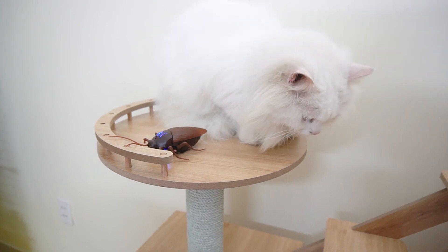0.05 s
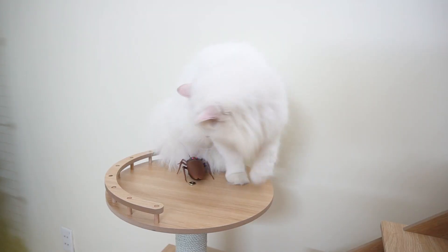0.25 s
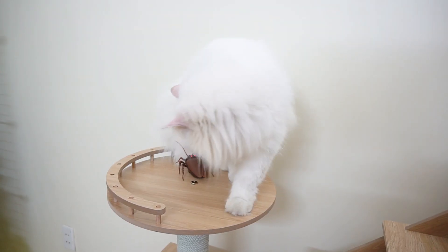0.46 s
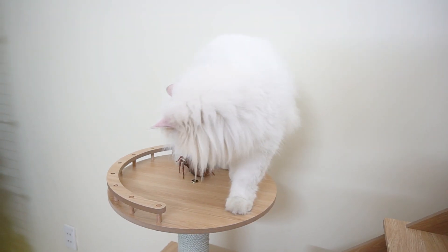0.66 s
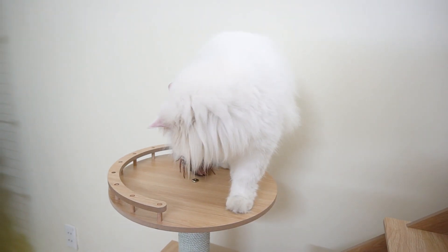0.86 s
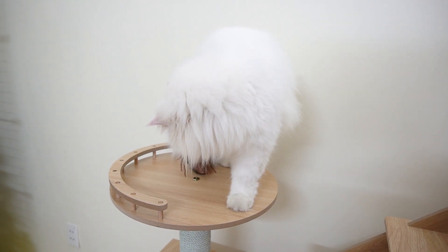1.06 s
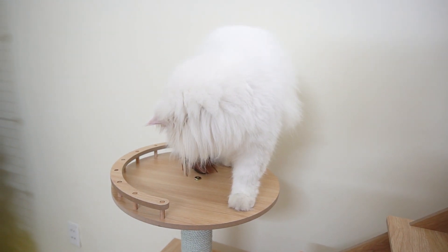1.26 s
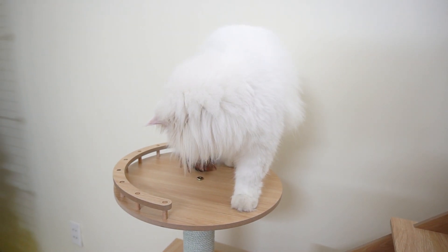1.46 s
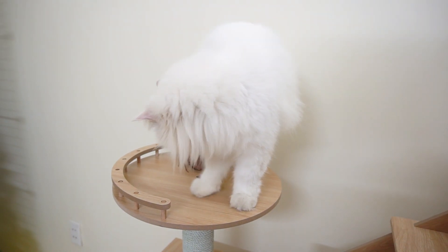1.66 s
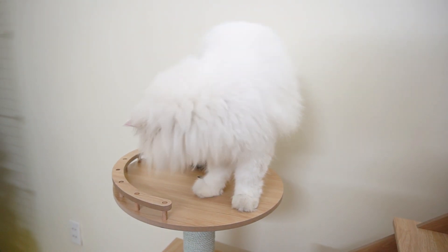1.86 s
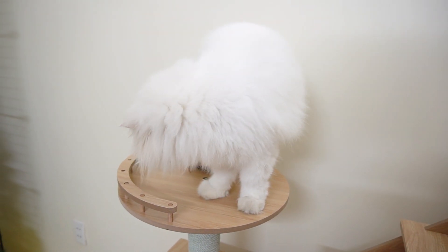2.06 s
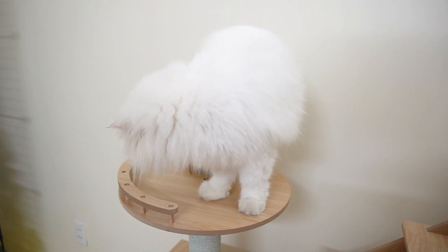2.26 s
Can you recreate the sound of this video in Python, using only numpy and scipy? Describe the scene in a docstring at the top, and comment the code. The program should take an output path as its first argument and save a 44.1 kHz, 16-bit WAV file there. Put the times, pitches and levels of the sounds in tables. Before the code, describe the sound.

A toy beetle's gears whirr and snap twice on a wooden platform, ending with a thump.

```python
"""A small bare room, a stereo microphone near a round wooden platform, which sits slightly to the left.
On it a cat pins a motorised toy beetle. After a faint shuffle the toy runs in two short bursts: its gears
whirr, its legs patter on the board and the blocked drive ratchets in sharp snaps. A plastic click comes
before the second burst, then the board is thumped and the toy rocks to rest. The room rings after it."""
import sys
import numpy as np
from scipy import signal
from scipy.fft import rfft, irfft, next_fast_len
from scipy.io import wavfile
from scipy.ndimage import uniform_filter1d

SR = 44100
rng = np.random.default_rng(int(sys.argv[2]) if len(sys.argv) > 2 else 0)


def store_wav(level_fs):
    """Save 16-bit WAV to argv[1]."""
    pcm = np.round(np.clip(np.atleast_2d(level_fs), -1, 1) * 32767)
    wavfile.write(sys.argv[1], SR, pcm.T.astype(np.int16))


N = 101429

# Spectrum of the shuffle. Each row: frequency in Hz, level in dB.
SHUFFLE_SPECTRUM = [(60, -4), (140, 1), (330, 4.5), (700, -6), (1400, -9), (2000, -18), (2700, -11.5),
                    (4000, -25.5), (15000, -30)]
# Runs of the motor. Each row: start, stop, spin-up and run-down time constants, all in seconds.
MOTOR_RUNS = [(0.207, 0.461, 0.0014, 0.05), (1.371, 1.78, 0.048, 0.062)]
# Resonances of the gearbox. Each row: frequency in Hz, width in Hz, gain in dB.
GEARBOX_MODES = [(1634, 280, -3.5), (1863, 110, 5), (2070, 178, 1.5), (3030, 470, -3), (3600, 340, -3.5),
                 (4707, 420, 3.5), (5420, 950, -1), (5940, 540, 0), (7600, 250, -2), (13300, 2000, -11)]
# Resonances of the wooden platform. Each row: frequency in Hz, width in Hz, gain in dB.
BOARD_MODES = [(234.3, 12.6, 6), (292.7, 22.4, 7.5), (338, 25.2, 5.5), (451, 40, 5.5), (603, 81, 0),
               (664.6, 24.2, 9), (785.4, 40, 5.5), (845, 19.7, 7.5), (923, 43, 2), (1032, 81, -5.5),
               (1310, 68, -4.5), (2310, 130, -19)]
# Slips of the ratchet. Each row: start in seconds, relative level in dB.
RATCHET_SLIPS = [(0.2096, -16), (0.2251, -17), (0.2412, -20), (0.2567, -23.3), (0.2756, -20),
                 (0.295, -18.5), (0.315, -19), (0.338, -17), (0.356, -20.5), (0.374, -18), (0.391, -19),
                 (0.4094, -21), (0.426, -19), (0.4445, -20.5), (0.4703, -17), (1.3978, -22), (1.424, -20.5),
                 (1.4479, -24.5), (1.468, -23.5), (1.4865, -22.5), (1.502, -22.5), (1.5174, -20.5),
                 (1.5345, -19.5), (1.5589, -24.5), (1.594, -20.5), (1.6213, -19.5), (1.6489, -16.5),
                 (1.67, -20), (1.6901, -18), (1.7071, -21.5), (1.7256, -23), (1.7474, -24), (1.7688, -21),
                 (1.793, -26.5)]
# Resonances of the plastic shell. Each row: frequency in Hz, width in Hz, gain in dB.
SHELL_MODES = [(2000, 590, -10), (4690, 600, 1.5), (5250, 320, 7), (6310, 400, 5), (7230, 410, 1),
               (7900, 410, -2), (9660, 790, -1.5), (11060, 510, -2), (13760, 1170, -3)]
# Knocks on the platform. Each row: start in seconds, level in dB, centre of the contact's spectrum
# in Hz, plastic tick against the wood in dB.
BOARD_KNOCKS = [(.224, -28, 317, -27), (.348, -32.5, 277, -27), (.468, -30.5, 343, -25),
                (1.402, -39, 387, -23), (1.703, -30.5, 690, -23), (1.87, -18.5, 540, -6),
                (1.9162, -11, 875, -9), (1.973, -23, 860, -2.5), (1.993, -25, 686, -41),
                (2.011, -26, 634, -30), (2.068, -35.5, 634, -22)]
# Spectrum of a plastic tick. Each row: frequency in Hz, level in dB.
TICK_SPECTRUM = [(200, -32), (1200, -3.5), (2400, -2.5), (3500, -4.5), (5000, -2.5), (8000, -10.5),
                 (15000, -12.5)]
# The toy tapping the rail. Each row: start in seconds, level in dB, tick against the wood in dB.
RAIL_TAPS = [(.444, -32.5, -9), (.465, -23.5, -6), (.49, -30.5, -11), (.512, -30.5, -9), (.559, -33, -5),
             (0.7961, -36.5, -8), (.874, -49, -21), (1.774, -30.5, -18)]
# Resonances of the wooden rail. Each row: frequency in Hz, width in Hz, gain in dB.
RAIL_MODES = [(660, 70, 1), (776, 31, 0), (855, 43, 3), (1310, 44, -6.5), (1639, 79, 0.5)]
# Resonances of the plastic click. Each row: frequency in Hz, width in Hz, gain in dB.
CLICK_MODES = [(2300, 730, -0.5), (7920, 280, 0), (12100, 1900, -13)]
# Spectrum of the click's crack. Each row: frequency in Hz, level in dB.
CRACK_SPECTRUM = [(300, -13.5), (1200, -23), (2650, 10.5), (4200, -3.5), (7500, 2.5), (11000, -8),
                  (13000, -16), (16000, -18)]
# Decay of the room. Each row: band centre in Hz, seconds to fall by 60 dB.
ROOM_DECAY = [(200, 0.93), (530, 0.52), (1400, 0.76), (3700, 0.5455), (9700, 0.43), (15000, 0.31)]
# Colour of the reverberation. Each row: frequency in Hz, gain in dB.
ROOM_SPECTRUM = [(100, -21.5), (300, 3), (800, -4.5), (2000, -2), (5000, -3), (9000, 0.5), (15000, -2.5)]
# Stereo width of the room. Each row: frequency in Hz, side against mid in dB.
ROOM_WIDTH = [(40, -37), (130, -7), (300, -14), (700, -7), (1400, -4.5), (3000, -3.5), (6000, 0),
              (10000, 0), (15000, 0.5)]
# Direct sound at the microphone. Each row: frequency in Hz, left against right in dB.
MIC_BALANCE = [(500, 0.5), (2500, -1), (5500, 5), (9000, 2.5), (14000, -2)]
# Spectrum of the room's quiet air. Each row: frequency in Hz, level in dB.
AIR_SPECTRUM = [(15, -65), (25, -4), (127, -2.5), (285, -10.5), (427, -7), (545, -8.5), (1740, -17.5),
                (2110, -20), (2410, -18), (8140, -25), (16000, -28)]


def amp(db):
    """Decibels to gain."""
    return 10 ** (np.asarray(db) / 20)


def unit(x):
    """Scale to rms 1."""
    return x / np.sqrt(np.mean(x ** 2) + 1e-30)


def blow(x, burst_s=0.002):
    """Scale a short sound to the energy of a full-level burst lasting burst_s."""
    return x * np.sqrt(burst_s * SR / (np.sum(x ** 2) + 1e-30))


def along(table, hz):
    """Read a table on a log-frequency axis."""
    freqs, values = np.array(table, float).T
    return np.interp(np.log(np.maximum(hz, 1)), np.log(freqs), values)


def colour(x, table):
    """Minimum-phase filter with a (Hz, dB) response."""
    size = 2 * next_fast_len(x.shape[-1])
    gain = amp(along(table, np.fft.rfftfreq(size, 1 / SR)))
    cepstrum = irfft(np.log(gain))
    cepstrum[1:size // 2] *= 2
    cepstrum[size // 2 + 1:] = 0
    return irfft(rfft(x, size) * np.exp(rfft(cepstrum)), size)[..., :x.shape[-1]]


def cut(x, hz, kind, order=2):
    """Low-pass or high-pass."""
    return signal.sosfilt(signal.butter(order, hz, kind, fs=SR, output="sos"), x)


def ring(x, modes, detune=1):
    """Drive a set of resonances of alternating polarity."""
    out = 0
    for k, (hz, width, db) in enumerate(modes):
        resonator = signal.iirpeak(hz * detune, hz / width, fs=SR)
        out = out + (-1) ** k * amp(db) * signal.lfilter(*resonator, x + 1e-18)
    return out


def add(track, start_s, x):
    """Mix a sound into a track at a time."""
    i = max(int(start_s * SR), 0)
    track[i:i + len(x)] += x[:max(N - i, 0)]


def chatter(rise_s, size=2048):
    """A cluster of tiny contacts that peaks at twice rise_s and quickly dies."""
    age = np.arange(size) / SR / rise_s
    return np.sign(rng.standard_normal(size)) * age ** 2 * np.exp(-age)


def impacts(hz, jitter, scatter_db, count=4000):
    """A train of unevenly spaced impulses of uneven strength, at a rate that may change."""
    gap, strength = rng.standard_normal((count, 2)).T
    cycles = np.cumsum(hz * np.ones(N)) / SR
    at = np.searchsorted(cycles, np.cumsum(np.exp(jitter * gap)))
    return unit(np.bincount(at[at < N], amp(scatter_db * strength)[at < N], N))


def shuffle(start_s=0.085, stop_s=0.24, db=-51.5):
    """A faint, dull shuffle on the board before the first run."""
    t = np.arange(N) / SR
    gate = uniform_filter1d(1. * ((t > start_s) & (t < stop_s)), size=400)
    return amp(db) * unit(colour(rng.standard_normal(N), SHUFFLE_SPECTRUM)) * gate


def motor_effort(start_share=0.36):
    """Motor effort (0-1): it jumps to start_share, spins up, holds and runs down."""
    t = np.arange(N) / SR
    effort = 0
    for start, stop, up, down in MOTOR_RUNS:
        spin = (t > start) * (1 - (1 - start_share) * np.exp(-np.maximum(t - start, 0) / up))
        effort = effort + spin * np.exp(-np.maximum(t - stop, 0) / down)
    return effort


def gears(effort, tooth_hz=953.3, hiss_db=-3.5, db=-28.5):
    """Meshing teeth ring the gearbox; at low speed they thin out and the rubbing hiss falls away."""
    teeth = impacts(tooth_hz * effort, jitter=0.25, scatter_db=4.5)
    teeth = cut(teeth, 1200, "high", order=4)
    hiss = cut(rng.standard_normal(N), 1390, "high") * effort ** 2
    whirr = unit(ring(teeth * effort, GEARBOX_MODES)) + amp(hiss_db) * unit(hiss)
    return amp(db) * unit(whirr) * np.sqrt(np.mean(effort ** 2))


def legs(effort, patter_hz=149.4, soft_hz=620, db=-47):
    """The legs patter softly on the board, louder as the motor comes up to speed."""
    steps = impacts(patter_hz, jitter=0.45, scatter_db=1)
    steps = cut(steps, soft_hz, "low", order=1)
    steps = cut(steps, 440, "high", order=4)
    return amp(db) * ring(steps * effort ** 2, BOARD_MODES) / np.std(ring(steps, BOARD_MODES))


def ratchet(rise_s=0.00017, rebound_s=0.0013, rebound_db=-3.5, sizzle_db=-4, gain_db=5.5):
    """At each slip the pawl strikes and bounces once, ringing the shell a little differently."""
    out = np.zeros(N)
    for start, db in RATCHET_SLIPS:
        lag, detune = 2 * rng.random(2) - 1
        rebound = amp(rebound_db) * np.roll(chatter(rise_s), int(rebound_s * (1 + lag / 2) * SR))
        shell = ring(chatter(rise_s) + rebound, SHELL_MODES, 1 + 0.013 * detune)
        sizzle = cut(chatter(rise_s) + rebound, 3750, "high")
        snap = blow(blow(shell) + amp(sizzle_db) * blow(sizzle))
        add(out, start, amp(db + gain_db) * snap)
    return out


def strike(modes, centre_hz, tick_db, grit=0.02, contact_s=0.0037, contact_q=1.69, tick_s=0.004):
    """One blow: a brief, gritty push rings the wood, and the toy's plastic adds a tick."""
    t = np.arange(SR // 2) / SR
    push = (t == 0) + grit * rng.standard_normal(len(t)) * np.exp(-t / contact_s)
    contact = ring(push, [(centre_hz, centre_hz / contact_q, 0)])
    wood = ring(contact, modes)
    tick = colour(rng.standard_normal(len(t)) * np.exp(-t / tick_s), TICK_SPECTRUM)
    return blow(wood) + amp(tick_db) * blow(tick)


def knocks(thud_hz=86, thud_db=-28):
    """Blows on the board, each with a low thud as the stand gives, and lighter taps on its rail."""
    out, t = np.zeros(N), np.arange(SR // 4) / SR
    thud = amp(thud_db) * blow(np.sin(2 * np.pi * thud_hz * t) * np.exp(-t * thud_hz))
    for start, db, centre_hz, tick_db in BOARD_KNOCKS:
        add(out, start, amp(db) * strike(BOARD_MODES, centre_hz, tick_db))
        add(out, start, amp(db) * thud)
    for start, db, tick_db in RAIL_TAPS:
        add(out, start, amp(db) * strike(RAIL_MODES, centre_hz=1090, tick_db=tick_db))
    return out


def click(start_s=1.2818, rise_s=0.00037, body_db=-21, crack_db=-33):
    """One hard click of plastic: a brief ring, and a broad crack at its peak."""
    body, crack = np.zeros(N), np.zeros(N)
    add(body, start_s, amp(body_db) * blow(ring(chatter(rise_s), CLICK_MODES)))
    pulse = colour(signal.unit_impulse(SR // 20), CRACK_SPECTRUM)
    add(crack, start_s + 2 * rise_s, amp(crack_db) * blow(pulse))
    return body, crack


def stereo_noise():
    """Noise that is alike left and right in the bass and wide in the treble."""
    mid, side = rng.standard_normal((2, N))
    return mid + colour(side, ROOM_WIDTH) * np.array([[1], [-1]])


def room(predelay_s=0.00094, build_s=0.00096):
    """The room's response at the microphone: dense reflections whose treble dies first."""
    t = np.maximum(np.arange(N) / SR - predelay_s, 0)
    spectrum, hz = rfft(stereo_noise()), np.fft.rfftfreq(N, 1 / SR)
    tail = 0
    for centre, t60 in ROOM_DECAY:
        band_weight = along([(f, f == centre) for f, _ in ROOM_DECAY], hz)
        band = irfft(spectrum * band_weight, N)
        fade = (1 - np.exp(-t / build_s)) * np.exp(-np.log(1000) * t / t60)
        tail = tail + band * fade / np.linalg.norm(fade)
    return colour(tail[:, :SR], ROOM_SPECTRUM)


def scene(air_db=-54.5):
    """Toy and board slightly left of the microphone, with the room and its quiet air all around."""
    effort = motor_effort()
    click_body, click_crack = click()
    # Each pair: a sound, its send to the room in dB.
    sources = [(ratchet(), -5.5), (gears(effort), -1.5), (legs(effort) + knocks() + shuffle(), 1.5),
               (click_body, -7), (click_crack, 12)]
    mono = sum(x for x, _ in sources)
    send = sum(x * amp(send_db) for x, send_db in sources)
    left = colour(mono, [(hz, db / 2) for hz, db in MIC_BALANCE])
    right = colour(mono, [(hz, -db / 2) for hz, db in MIC_BALANCE])
    reverb = signal.fftconvolve(send[None], room(), axes=1)[:, :N]
    air = amp(air_db) * unit(colour(stereo_noise(), AIR_SPECTRUM))
    return np.array([left, right]) + reverb + air


def record(dry):
    """Behind the microphone, a band-limited input rounds the highest peaks; the top is cut steeply."""
    top_hz, ceiling = 15900, 0.72
    heard = cut(dry, top_hz, "low", order=10)
    rounded = heard / (1 + (heard / ceiling) ** 4) ** (1 / 4)
    return signal.sosfilt(signal.ellip(10, .2, 80, top_hz, fs=SR, output="sos"), rounded)


dry = scene()
out = record(dry)
store_wav(out)
```